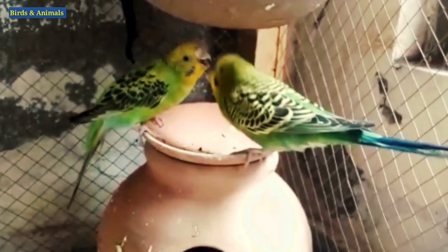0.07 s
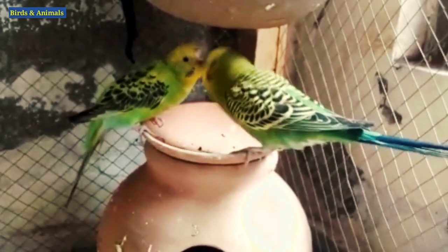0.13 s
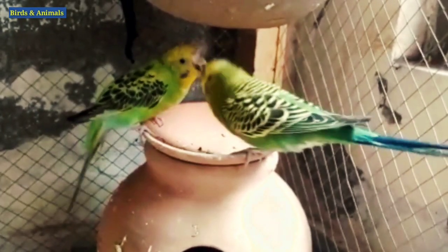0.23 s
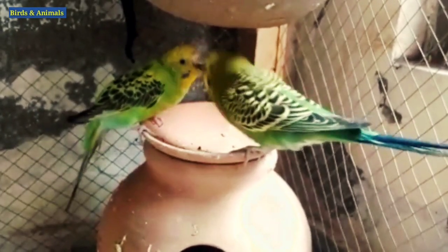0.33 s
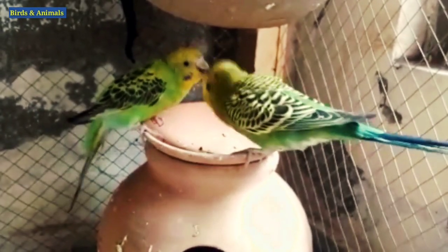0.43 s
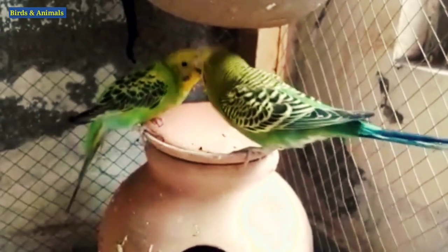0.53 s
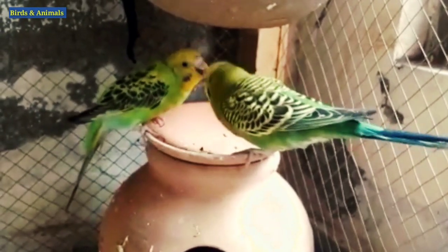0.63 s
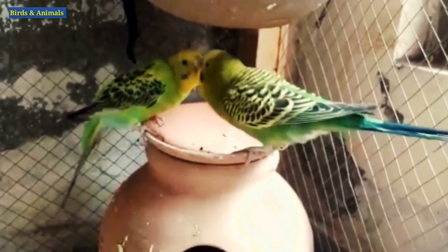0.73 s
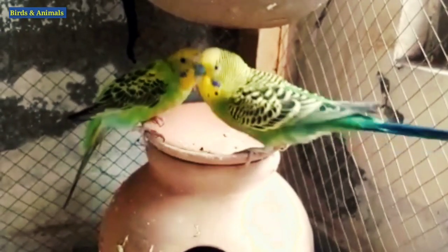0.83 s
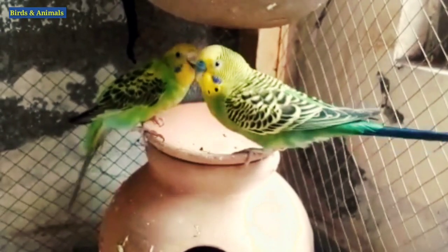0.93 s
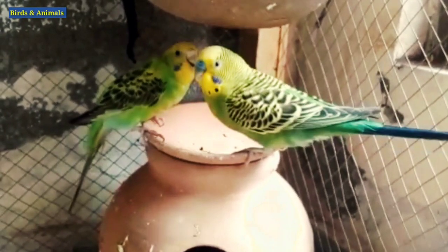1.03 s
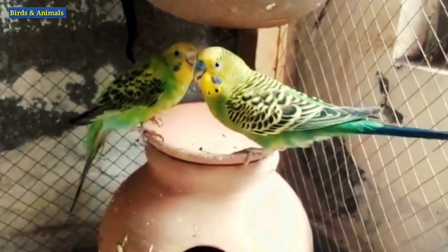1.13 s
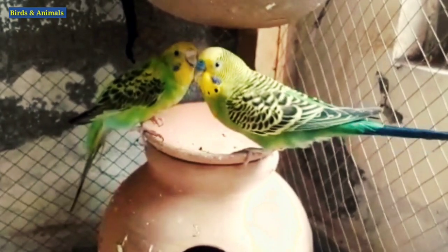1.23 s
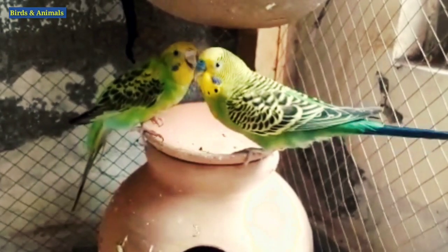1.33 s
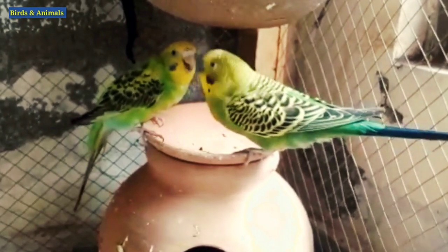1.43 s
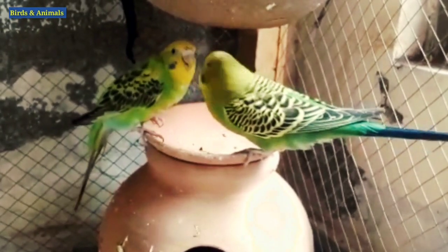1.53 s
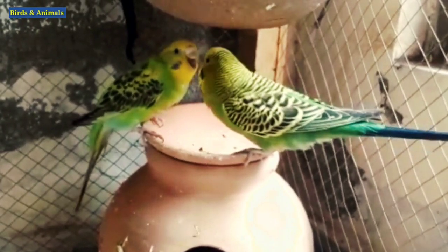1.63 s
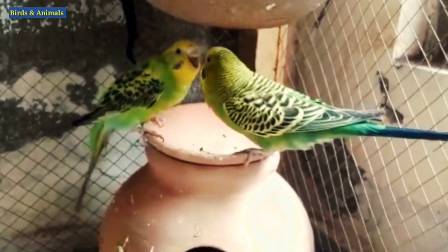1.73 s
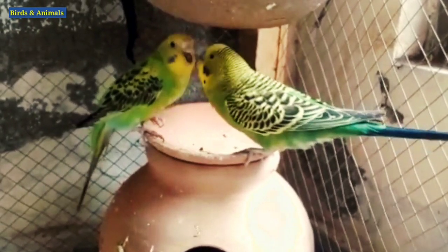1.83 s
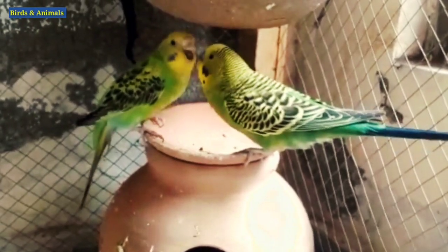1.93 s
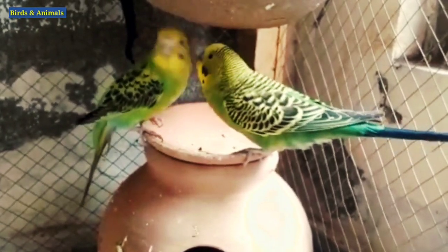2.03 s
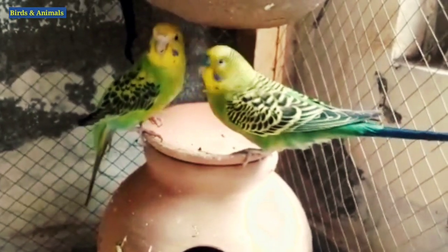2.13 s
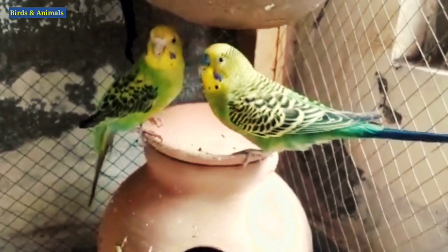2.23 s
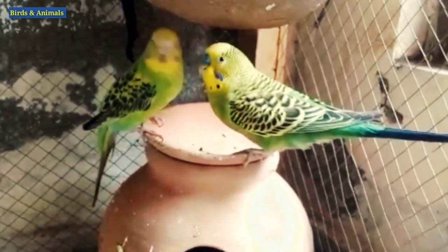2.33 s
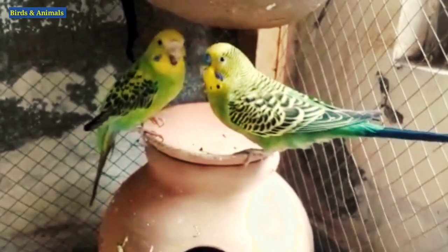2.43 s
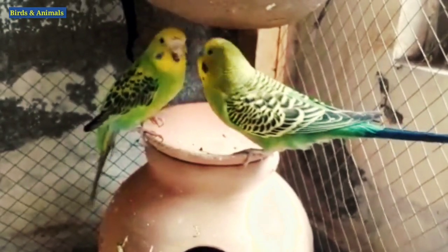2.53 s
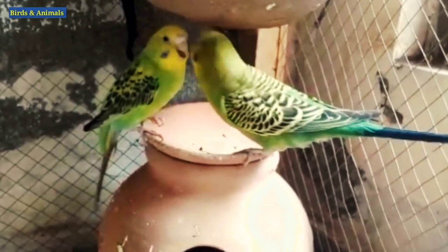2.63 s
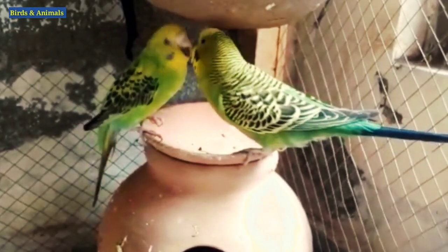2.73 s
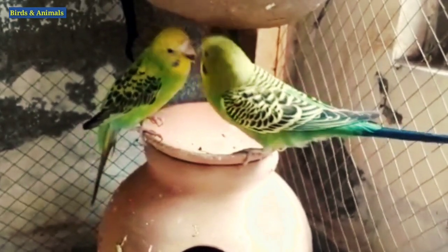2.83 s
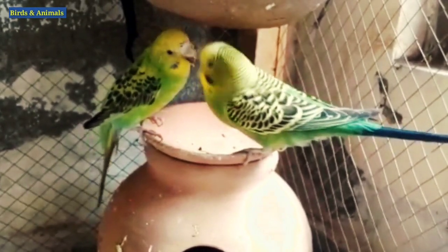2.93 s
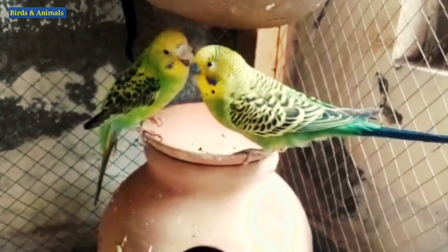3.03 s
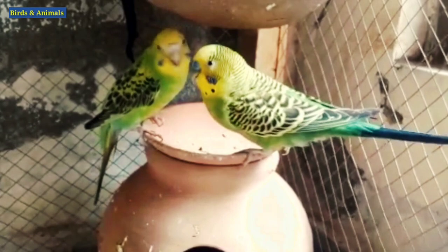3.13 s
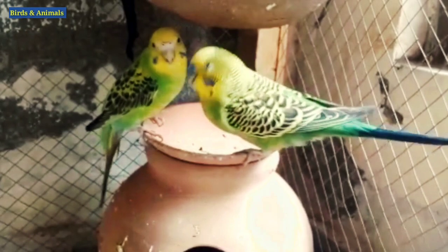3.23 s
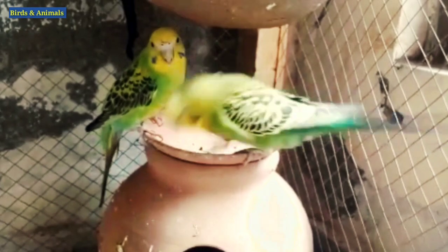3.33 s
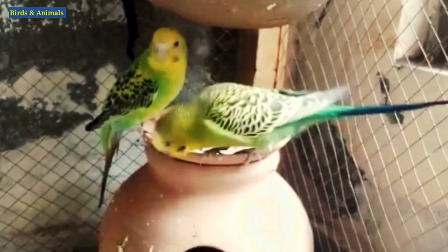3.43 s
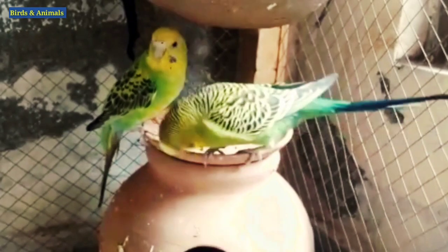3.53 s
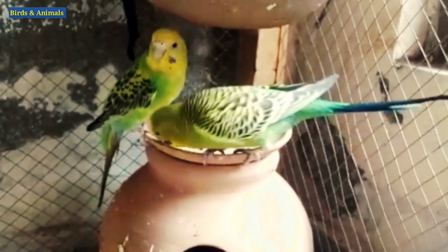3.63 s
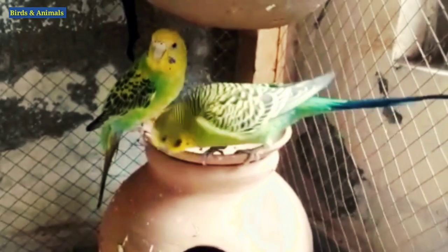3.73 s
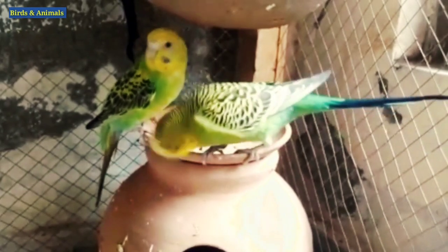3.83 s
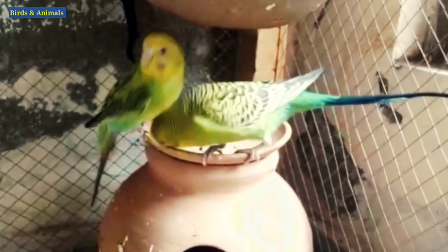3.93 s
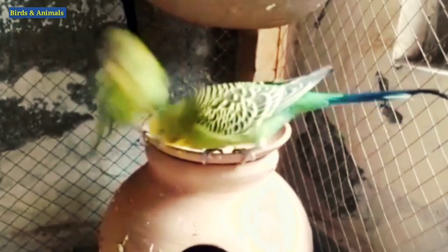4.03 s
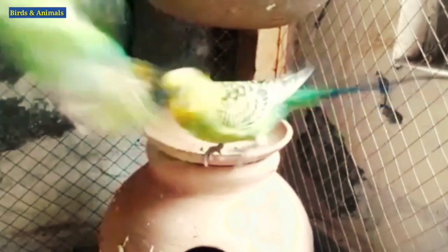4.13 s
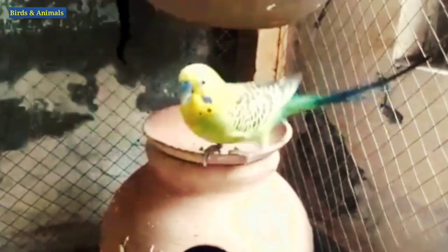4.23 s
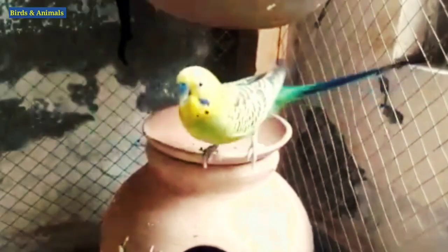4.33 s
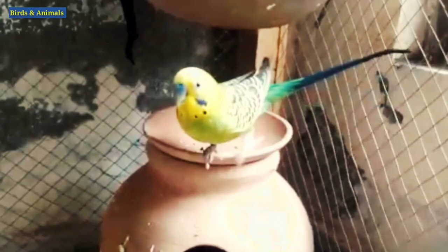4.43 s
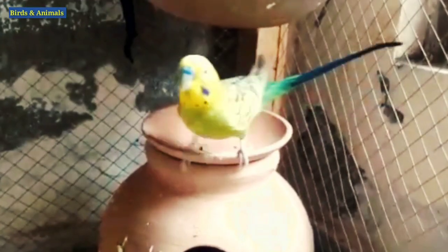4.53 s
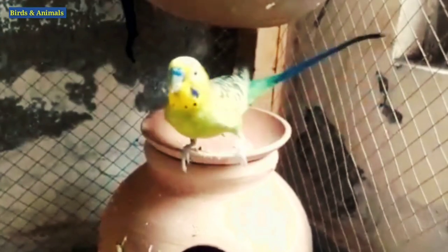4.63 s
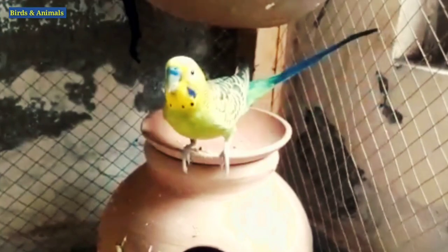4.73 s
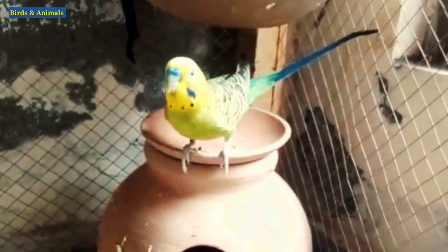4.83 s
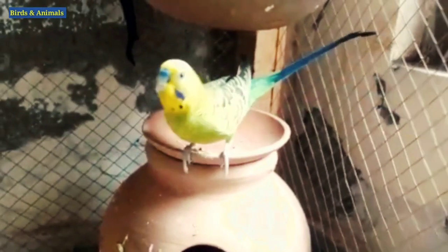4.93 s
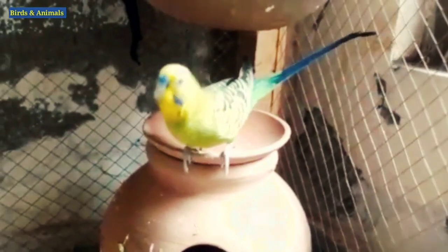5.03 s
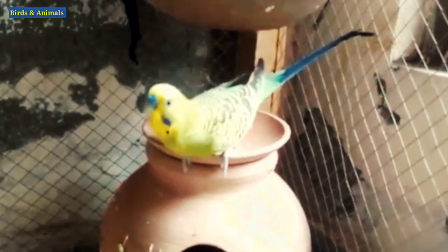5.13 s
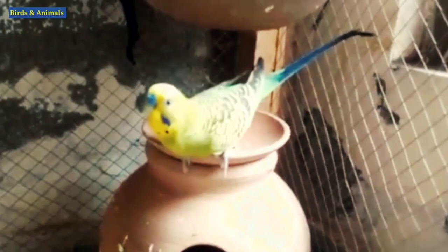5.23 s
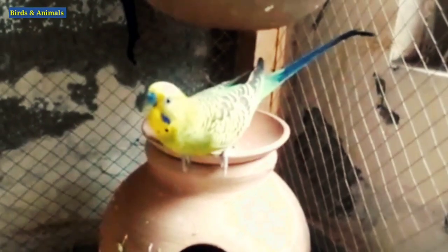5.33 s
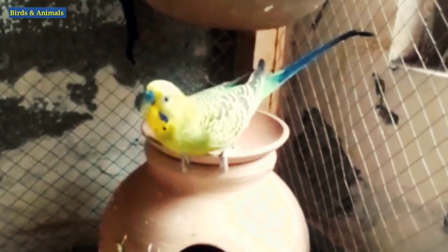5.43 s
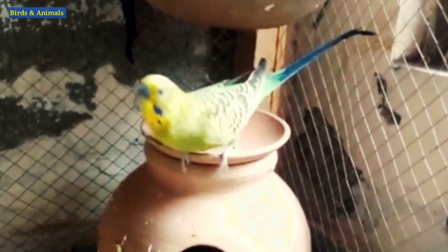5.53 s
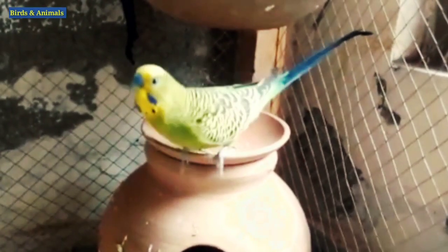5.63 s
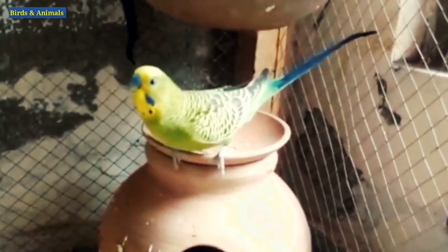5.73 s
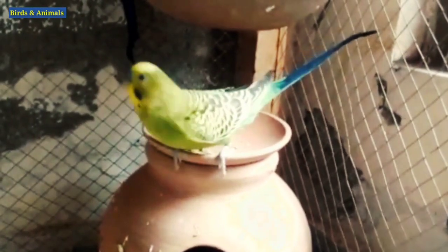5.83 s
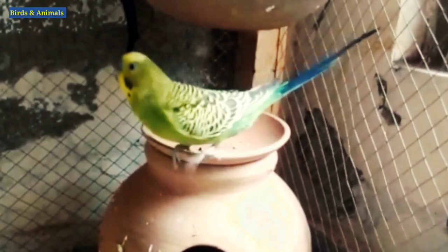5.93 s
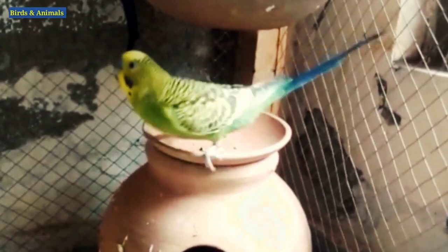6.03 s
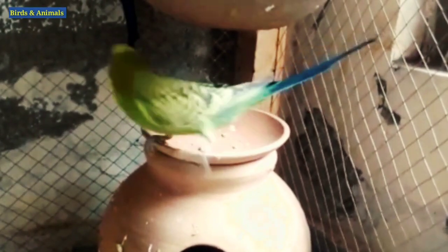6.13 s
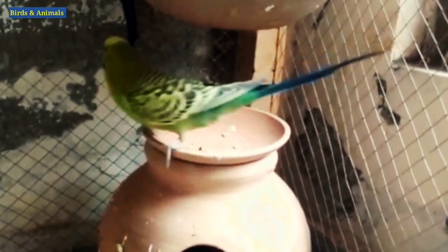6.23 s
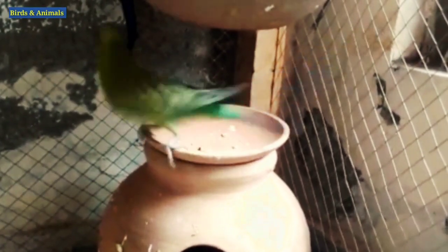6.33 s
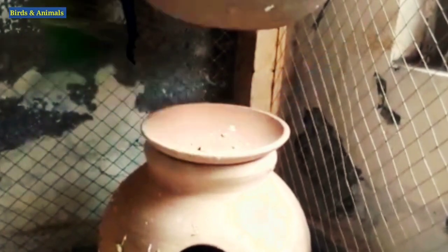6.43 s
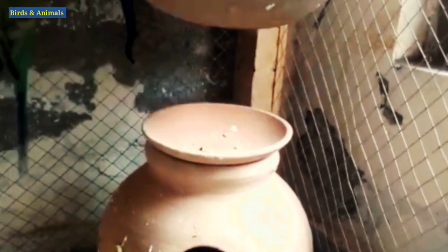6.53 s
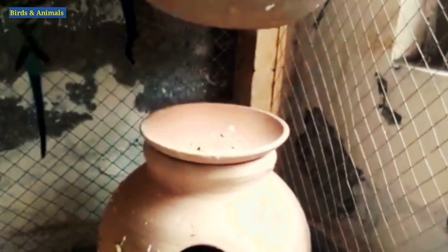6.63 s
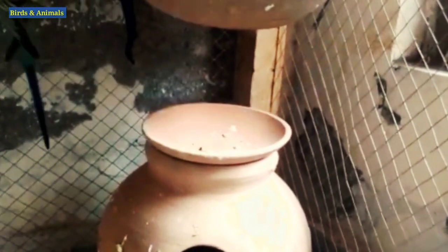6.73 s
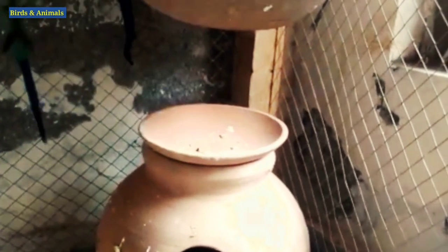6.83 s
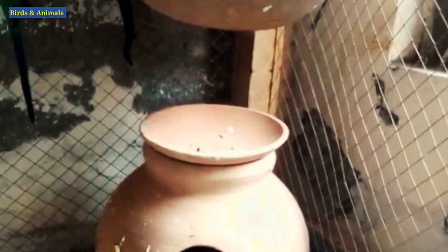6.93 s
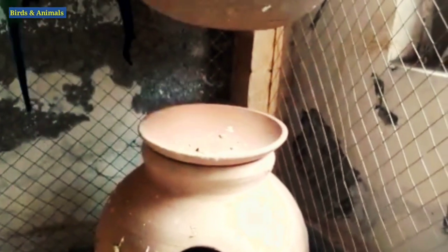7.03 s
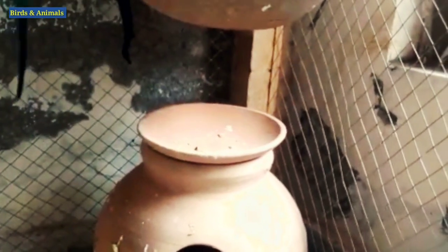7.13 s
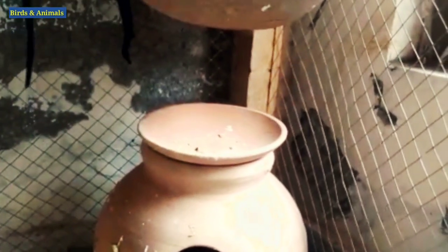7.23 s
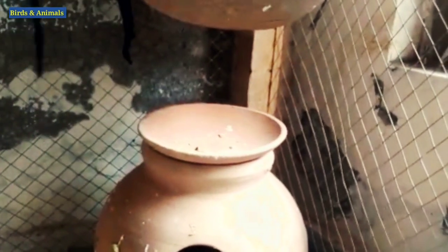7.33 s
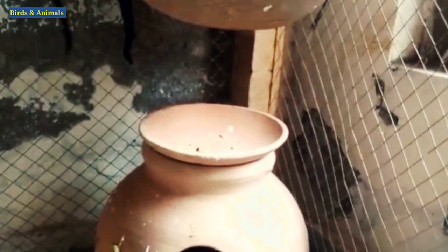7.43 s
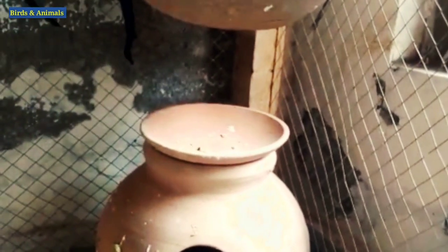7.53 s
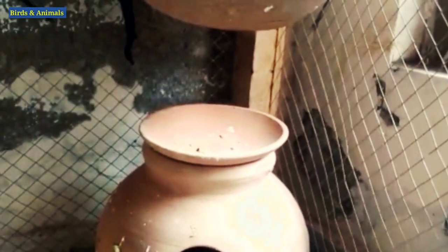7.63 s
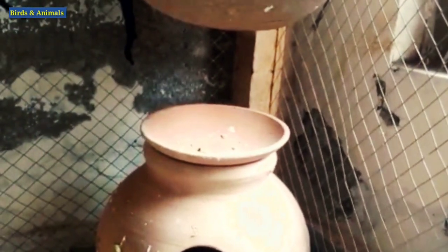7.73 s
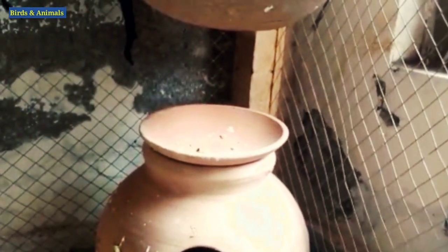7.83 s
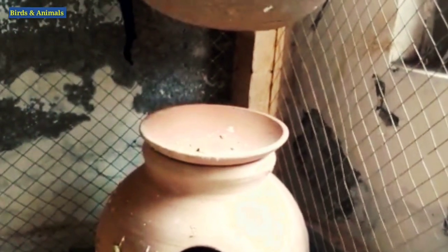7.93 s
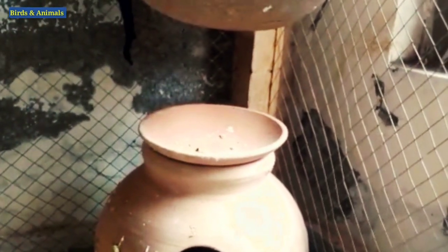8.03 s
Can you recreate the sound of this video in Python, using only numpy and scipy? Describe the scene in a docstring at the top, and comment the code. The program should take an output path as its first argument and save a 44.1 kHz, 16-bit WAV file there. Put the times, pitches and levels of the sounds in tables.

```python
"""Two budgerigars warble and squawk close to the microphone, on a clay dish in a wire cage with hard
walls near by. Each voice is a gliding syrinx tone that throbs and leaks air with effort. One bird flies
off: its feathers swish and its wingbeats buffet the microphone. Claws tick and scrape on the clay, and
feet rock the hollow pot. Far off, a motor drones under rumble and room hiss."""
import sys
import numpy as np
from scipy import signal
from scipy.fft import rfft, irfft, next_fast_len
from scipy.io import wavfile
from scipy.ndimage import uniform_filter1d, map_coordinates

SR = 44100
rng = np.random.default_rng(int(sys.argv[2]) if len(sys.argv) > 2 else 0)


def unload_audio(sound):
    """Save the sound as a 16-bit wav file, at the path given as the first command line argument."""
    columns = np.transpose(np.atleast_2d(sound))
    # keep every value between -1 and 1, then stretch to whole-number steps
    steps = np.round(np.clip(columns, -1, 1) * 32767)
    wavfile.write(sys.argv[1], SR, steps.astype(np.int16))


N = 356047
DOWNSTROKES_S = 4.171 + 0.043 * np.arange(5)  # the five wingbeats of the take-off


def amp(db):
    return 10 ** (np.asarray(db) / 20)


def unit(x):
    """Scale to an rms of 1."""
    return x / np.sqrt(np.mean(x ** 2) + 1e-20)


def along(points, hz):
    """Interpolate (f/Hz, value) points on a log frequency axis."""
    f, values = np.transpose(points)
    return np.interp(np.log(hz + 1), np.log(f + 1), values)


def wobble(rate, size):
    """A smooth random curve, rate knots a second."""
    knots = rng.standard_normal(int(size * rate / SR) + 4)
    return map_coordinates(knots, [np.arange(size) * rate / SR])


def filtered(x, response):
    """Filter x by a gain given as a function of f/Hz."""
    size = next_fast_len(len(x) + 8192)
    return irfft(rfft(x, size) * response(np.fft.rfftfreq(size, 1 / SR)), size)[:len(x)]


def noise(spectrum, patchy_db):
    """Coloured noise of rms 1 with patches of random gain in time and frequency."""
    bins = signal.stft(rng.standard_normal(N), nperseg=512)[2]
    patches = uniform_filter1d(rng.standard_normal(bins.shape), size=6, axis=0)
    patches = uniform_filter1d(patches, size=10, axis=1)
    white = signal.istft(bins * amp(patchy_db * unit(patches)), nperseg=512)[1][:N]
    return unit(filtered(white, lambda hz: amp(along(spectrum, hz))))


def ringing(modes, spread_db, rise_s):
    """One blow on an object: each mode decays from a random strength and phase."""
    t = np.arange(SR // 4) / SR
    ring = sum(amp(db + spread_db * rng.normal() - 60 * t / t60)
               * np.sin(2 * np.pi * (hz * t + rng.random())) for hz, db, t60 in modes)
    return ring * (1 - np.exp(-t / rise_s))


def add(out, s, sound):
    """Mix a sound in at time s."""
    part = out[round(s * SR):][:len(sound)]
    part += sound[:len(part)]


def motor_and_room():
    """Far from the microphone: rumble, the wavering drone of a motor, and room hiss."""
    # course of the background: t/s, rumble level/dB, hiss level/dB
    levels = [(0.0, -48, -59), (3.3, -49.5, -70.5), (4.0, -49.5, -65), (4.32, -39, -62), (4.74, -47, -68),
              (6.2, -49.5, -73), (6.4, -49.5, -59.5), (6.7, -55.5, -66.5), (7.6, -60, -75.5),
              (8.07, -64.5, -88)]
    # orders of the motor: f/Hz, level/dB relative to the rumble
    motor_orders = [(60, -12), (90, -10.5), (121, -3.5), (151, -7)]
    # spectrum of the distant rumble: f/Hz, level/dB
    rumble_spectrum = [(15, -37.5), (25, -24), (43, -1.5), (125, 0.5), (161, -6.5), (182, -15.5),
                       (240, -13.5), (298, -12), (353, -16.5), (389, -31.5), (450, -29.5), (580, -55),
                       (990, -120)]
    # spectrum of the room hiss: f/Hz, level/dB
    hiss_spectrum = [(210, -18), (350, -5.5), (591, -6.5), (1770, -6), (4040, -20), (5630, -16),
                     (7030, -19), (8250, -41), (12700, -29), (15600, -48.5)]
    t = np.arange(N) / SR
    times, *columns = np.transpose(levels)
    rumble_db, hiss_db = (np.interp(t, times, column) for column in columns)
    drone = sum(amp(db + 1.3 * wobble(3.6, N)) * np.sin(2 * np.pi * hz * t + 0.4 * wobble(2.6, N))
                for hz, db in motor_orders)
    low = amp(rumble_db) * (noise(rumble_spectrum, patchy_db=1) + drone)
    return low + amp(hiss_db + 3.5) * noise(hiss_spectrum, patchy_db=2.5)


def walls(direct):
    """Hard walls near the cage add a short, diffuse echo, drawn afresh every quarter second."""
    # decay of the reflections: f/Hz, t60/s
    decay = [(300, 0.55), (2000, 0.35), (6000, 0.21), (12000, 0.24)]
    out, block, delay_s = np.zeros(N), SR // 4, .0045
    for start in range(0, N, block):
        hz, t, bins = signal.stft(rng.standard_normal(SR // 3), SR, nperseg=256)
        tail = signal.istft(bins * amp(-60 * t / along(decay, hz)[:, None]), SR, nperseg=256)[1]
        echo = signal.fftconvolve(direct[start:start + block], tail / np.linalg.norm(tail))
        add(out, start / SR + delay_s, echo)
    return out


def gusts():
    """Each downstroke pushes the microphone's membrane in and lets it swing back, with turbulence."""
    out, t = np.zeros(N), np.arange(SR // 16) / SR
    swell = (t / 0.017) * np.exp(1 - t / 0.013)
    swing = np.sin(2 * np.pi * 58 * t)
    for s in DOWNSTROKES_S:
        add(out, s, amp(-24.5) * swell * (swing + 0.61 * wobble(413, len(t))))
    return out


def wings():
    """Each stroke is a puff of feather noise; the wingbeats fade as the bird leaves the microphone."""
    # spectrum of feather noise: f/Hz, level/dB
    feather_spectrum = [(290, -0.5), (500, -1.5), (666, -3), (1410, -2.5), (2540, -14.5), (4070, -15),
                        (7670, -29), (15500, -39)]
    # rustles of wings and feathers: t/s, t60/s, level/dB, tilt/(dB per octave)
    rustles = [(4.026, 0.37, -46, -2), (4.2, 0.74, -53.5, 0.5), (4.875, 0.25, -55, 4),
               (4.93, 0.48, -54.5, 3), (5.172, .26, -60, 7), (6.527, 0.27, -40.5, 0.5),
               (6.721, 0.15, -63.5, 8.5), (6.8, 0.14, -62.5, 5), (6.839, 0.076, -56, 4.5),
               (7.054, 0.2, -58, 4.5), (7.164, 0.084, -55, 5.5), (7.43, 0.26, -58.5, 1),
               (7.61, 0.11, -65, 7.5), (7.715, 0.5, -53, -0.5)]
    out, t = np.zeros(N), np.arange(SR // 2) / SR
    swish = noise(feather_spectrum, patchy_db=3)
    wingbeats = [(s, 0.17, -37 - 0.7 * k, 2) for k, s in enumerate(DOWNSTROKES_S)]  # same columns
    for strokes, rise_s in (rustles, 0.023), (wingbeats, .004):
        for s, t60, db, tilt in strokes:
            envelope = np.minimum(np.sqrt(t / rise_s), amp(-60 * (t - rise_s) / t60))
            puff = np.resize(swish[round(s * SR):], len(t)) * envelope
            add(out, s, amp(db) * filtered(puff, lambda hz: amp(tilt * np.log2(hz / 2000 + 0.081))))
    return out


def pot():
    """Soft feet rock the hollow clay; left alone, it rocks to rest at uneven gaps."""
    # knocks of the rocking pot: t/s, level/dB
    knocks = [(0.049, -35.5), (0.281, -33), (0.395, -32), (0.709, -38), (1.847, -37), (2.154, -36),
              (2.814, -39), (2.9, -31), (4.039, -34.5), (4.103, -26.5), (4.13, -18.5), (4.15, -18.5),
              (6.218, -30.5), (6.25, -30.5), (6.327, -27), (6.36, -29), (6.418, -33), (6.458, -23.5),
              (6.476, -25), (6.514, -31), (7.728, -43.5), (7.79, -46.5)]
    # modes of the pot: f/Hz, level/dB, t60/s
    pot_modes = [(274, -6.5, .08), (319, 0, 0.13), (349.3, -3.5, 0.12), (411, -4, .06), (504, -5, 0.044),
                 (571.6, -15, 0.13), (1754, -13.5, 0.083), (3290, -29.5, .1)]
    out = np.zeros(N)
    settle_s, gap_s, loss_db = 6.569, 0.057, 1
    settling = [(settle_s + gap_s * (k + 0.22 * rng.normal() * (k > 0)), -39 - loss_db * k)
                for k in range(7)]
    for s, db in knocks + settling:
        add(out, s - .003, amp(db - 2.5) * ringing(pot_modes, spread_db=1.5, rise_s=.008))
    return out


def claw_ticks():
    """Each tick is a dry scratch on the clay; a bird standing on the dish adds faint ones at random."""
    # claw ticks: t/s, level/dB
    ticks = [(3.541, -51), (4.102, -31), (4.174, -32), (4.209, -27.5), (4.438, -37.5), (4.464, -38),
             (4.487, -40.5), (4.537, -43), (4.616, -47.5), (4.73, -45.5), (4.824, -53.5), (4.955, -44),
             (5.044, -48.5), (5.172, -42.5), (5.215, -50.5), (5.512, -51), (5.705, -49.5), (6.275, -54),
             (6.306, -54), (6.559, -36), (6.805, -47), (7.025, -51), (7.06, -48), (7.712, -46.5)]
    # a claw hits the rim flat: t/s, level/dB
    rim_taps = [(6.421, -33.5), (6.473, -38.5)]
    out, t = np.zeros(N), np.arange(SR // 16) / SR
    fidgets = [(rng.uniform(3.4, 6.4), rng.normal(-66, 3)) for _ in range(30)]
    envelope = amp(-60 * t / .035) * (1 - np.exp(-t / .003))
    for s, db in ticks + fidgets:
        sharp, dull = rng.standard_normal((2, len(t))) * envelope
        add(out, s, amp(db - 1) * filtered(sharp, lambda hz: np.clip(hz / 9000, 0, 1) ** 2))
        add(out, s, amp(db + 4) * filtered(dull, lambda hz: hz < 7400))
    for s, db in rim_taps:
        tap = rng.standard_normal(len(t)) * amp(db - 60 * t / .014)
        add(out, s, filtered(tap, lambda hz: (hz > 900) & (hz < 6000)))
    return out


def claw_scrapes():
    """While claws slide, tiny slips rasp and keep the dish ringing, now one mode, now another."""
    # slides on the dish: t/s, hold/s, level/dB
    slides = [(3.435, .01, -64), (3.537, 0.019, -56), (3.699, 0.36, -65), (4.098, 0.045, -53),
              (4.27, 0.13, -56.5), (4.633, 0.033, -56.5), (5.192, 0.0096, -62), (5.39, 0.022, -64),
              (5.695, 0.05, -58), (6.085, 0.017, -60), (6.126, 0.035, -60), (6.282, 0.041, -57.5),
              (6.418, 0.033, -50.5)]
    # modes of the dish: f/Hz, level/dB
    dish_modes = [(1770, -8), (2050, -9), (3130, -5), (5150, 1), (6050, 3.5), (6480, -6), (7310, 1.5),
                  (9400, -3.5), (9950, 0.5), (10250, -1), (12360, 2.5), (12900, 4), (13250, 1)]
    rasp_spectrum = [(1500, -10), (6500, 6), (8300, -16), (13000, 2)]  # f/Hz, level/dB
    grip_db_per_s, release_db_per_s = 450, 300
    t = np.arange(N) / SR
    pressure = sum(amp(db - grip_db_per_s * np.maximum(s - t, 0)
                       - release_db_per_s * np.maximum(t - s - hold, 0)) for s, hold, db in slides)
    jerks = rng.random(N) < 400 / SR
    slips = (jerks + 0.043) * rng.standard_normal(N) * pressure
    slips *= unit(amp(3 * wobble(30, N)))  # the claw grips and lets go
    out = amp(11) * filtered(slips, lambda hz: amp(along(rasp_spectrum, hz)))
    for hz, db in dish_modes:
        drive = slips * unit(amp(3.5 * wobble(26, N)))
        t60 = .028 * np.sqrt(14000 / hz)
        ring = ringing([(hz, db, t60)], spread_db=-1, rise_s=0.00039)
        out += amp(-10.5) * signal.oaconvolve(drive, ring)[:N]
    return out


def tongue_clicks(breath):
    """The tongue clicks, singly or in quick runs: each click is a short burst of breath noise."""
    # single clicks: t/s, level/dB
    clicks = [(0.3416, -17.5), (1.5994, -38), (1.8033, -31.5), (1.8512, -45), (1.9599, -36), (2.4594, -41),
              (2.4694, -36), (2.4823, -30), (2.5247, -19), (3.841, -31)]
    # runs of clicks: start t/s, end t/s, rate/Hz, level/dB
    trills = [(1.648, 1.697, 100, -47), (1.694, 1.714, 162, -37.5)]
    out, t = np.zeros(N), np.arange(600) / SR
    envelope = amp(-60 * t / 0.0101) * (1 - np.exp(-t / 0.0011))
    runs = [(s, db) for start, end, rate, db in trills for s in np.arange(start, end, 1 / rate)]
    for s, db in clicks + runs:
        add(out, s, amp(db) * envelope * breath[round(s * SR):][:len(t)])
    return out


def syrinx(glide_hz, highest_hz, second_db, rough):
    """The membrane sings a gliding tone; effort makes it throb. Returns the tone and the throb gain."""
    # colour of the voice from the 3rd harmonic up, including the microphone's drop above 7.5 kHz:
    # f/Hz, gain/dB
    colour = [(600, 7.5), (4000, -0.5), (6200, -2), (7200, -6.5), (8200, -15.5), (15000, -12)]
    size, throb_hz, squawk_rough = len(glide_hz), 290, .74
    throb_cycles = np.cumsum(throb_hz * (1 + .2 * wobble(150, size))) / SR + rng.random()
    sweep = .055 * min(rough / squawk_rough, 1) ** 3 * np.sin(2 * np.pi * throb_cycles)
    waver = .007 * wobble(35, size) + .006 * wobble(110, size) + 0.015 * rough * wobble(70, size)
    jitter = (0.0024 + 0.056 * rough ** 3) * np.clip(wobble(420, size), -2, 2)
    phase = 2 * np.pi * np.cumsum(glide_hz * (1 + sweep + waver + jitter)) / SR
    shine = unit(amp(3.5 * wobble(30, size)))  # overtones come and go as the beak moves
    fall_db_per_octave = max(19.5 - 1.3 * max(second_db, 0), 3)
    overtones = amp(second_db) * np.sin(2 * phase)
    for k in range(3, int(15000 / highest_hz) + 1):
        source_db = 0.99 * second_db - 6 - fall_db_per_octave * np.log2(k / 3)
        overtones += amp(source_db + along(colour, k * glide_hz)) * np.sin(k * phase)
    tone = np.sin(phase) + (shine if rough < squawk_rough else 1) * overtones
    tone *= unit(amp(2.2 * wobble(70, size)))  # the voice falters
    tone *= unit(1 + 0.42 * rough ** 3 * wobble(2000, size))  # turbulence smears rough notes
    # uneven closures of the membrane chop the sound into bursts
    closures = 7.6 * np.cos(2 * np.pi * throb_cycles) + 1.3 * np.tanh(wobble(260, size))
    return tone, unit(amp(min(0.062 + rough, .8) * closures))


def budgerigars():
    """Close to the microphone, the birds string gliding, breathy syllables and clicks into a warble."""
    # syllables: t/s, length/s, start f/Hz, turn f/Hz, end f/Hz, place of the turn/0-1, level/dB,
    # 2nd harmonic/dB relative to the 1st, roughness/0-1, breath/dB relative to the level
    syllables = [(0.015, 0.022, 3150, 3170, 3100, 0.4, -42, 10.5, 0.6, 8),
                 (0.031, 0.059, 3000, 3300, 3330, 0.56, -33, 14, 0.8, 10),
                 (0.099, 0.014, 6500.0, 4900, 7700, 0.46, -32, -40.5, 0.3, -19.5),
                 (0.15, 0.057, 2800, 3100, 3300, 0.59, -33, 12.5, 0.91, 10.5),
                 (0.192, 0.046, 3227, 3100, 2500, 0.7, -27.5, -3, 0.3, -11.5),
                 (0.238, 0.01, 1865, 2000, 1700, 0.5, -33.5, -7.5, 0.37, 4.5),
                 (0.253, 0.019, 3200, 3330, 3130, 0.38, -23.5, -19, 0.3, -16),
                 (0.27, 0.052, 2637, 2700, 1390, 0.53, -27.5, -17.5, 0.64, -10),
                 (0.333, 0.049, 2850.0, 2630, 2130.0, 0.27, -35.5, -15.5, 0.48, -7),
                 (0.372, 0.02, 5700, 6130, 5500, 0.47, -29, -19, 0.45, -13.5),
                 (0.375, 0.045, 1713, 1670, 1970, 0.5, -37, -17, 0.24, -4),
                 (0.397, 0.032, 4900, 3200, 2750, 0.43, -35.5, -18.5, 0.3, -8),
                 (0.427, 0.031, 1873, 1800.0, 2160.0, 0.46, -35, -6, 0.48, -6.5),
                 (0.449, 0.016, 2820, 3200.0, 2950.0, 0.5, -32, -22, 0.38, -10),
                 (0.47, 0.041, 2585, 2800, 2500, 0.55, -39, -26, 0.4, -14.5),
                 (0.522, 0.02, 2320, 2050, 1850, 0.42, -40.5, -20.5, 0.14, -17),
                 (0.583, 0.017, 990, 1010, 950, 0.69, -39.5, 9, 0, 13),
                 (0.609, 0.071, 4220, 4910, 4730, 0.35, -17.5, -30, 0.8, -33),
                 (0.737, 0.032, 1504, 1650, 1300, 0.45, -34.5, -6.5, 0.88, -10.5),
                 (0.756, 0.022, 2780, 2450, 3200, 0.52, -37, -26, 0.27, -10),
                 (0.783, 0.048, 1950, 2920, 1900, 0.6, -34, -26, 0.35, -14),
                 (0.823, 0.026, 1450, 1720, 1700, 0.54, -30, -18, 0.45, -22),
                 (0.837, 0.054, 3450, 3040, 2400, 0.54, -37, -23, 0.35, -11),
                 (0.862, 0.061, 774, 1140, 1260, 0.62, -51, -1, 0.3, -14),
                 (0.898, 0.043, 2076, 1600, 1590, 0.58, -35.5, -27.0, 0.23, -19),
                 (0.946, 0.028, 2000.0, 2160, 1800, 0.5, -45.5, -1, 0.85, -16),
                 (0.975, 0.016, 1400.0, 1400, 1460, 0.46, -42.5, -1.5, 0.33, -14),
                 (1.002, 0.012, 1300.0, 1200, 1550, 0.52, -45.5, 0, 0.83, -15.0),
                 (1.023, 0.09, 839, 750, 936.0, 0.4, -57, 7.5, 0.03, -1),
                 (1.107, 0.041, 1260, 1290, 1040, 0.22, -44.5, -2.5, 0.66, -7.5),
                 (1.125, 0.037, 1720, 1680, 1240, 0.62, -42.5, -16, 0.2, -28),
                 (1.164, 0.058, 1450, 1260, 1330, 0.5, -49, -5.5, 0, -31),
                 (1.211, 0.032, 880, 860, 1587.0, 0.25, -41.5, -0.5, 0.5, -8),
                 (1.325, 0.057, 1102, 1000, 1050, 0.7, -53.5, -5, 0.55, -8.5),
                 (1.348, 0.0065, 4150, 4500, 3100, 0.75, -36, -39, 0.4, -11),
                 (1.353, 0.046, 3144, 3250, 1580, 0.41, -36.5, -8.5, 0.48, -4.5),
                 (1.396, 0.03, 2390, 3300, 2300, 0.55, -32.5, -25, 0.72, -11),
                 (1.423, 0.02, 4140, 3500, 4700, 0.6, -28.5, -19, 0.4, -8),
                 (1.443, 0.022, 2430.0, 2500, 2100, 0.2, -33, -21, 0.08, -13),
                 (1.447, 0.025, 2950, 2880, 2830, 0.54, -23.5, -3.5, 0.04, -28),
                 (1.473, 0.014, 1440, 1750, 1480, 0.42, -36.5, -18.5, 0.38, 8.5),
                 (1.725, 0.039, 1393, 1640, 1487.0, 0.58, -47.5, -2.5, 0.4, -24),
                 (1.87, 0.061, 1347, 1267.0, 1150, 0.55, -49.5, -3.5, 0.38, -28),
                 (1.995, 0.032, 1096, 1180, 1670, 0.61, -47, -1.5, 0.93, -11.5),
                 (2.027, 0.035, 1300, 1370, 1200, 0.53, -51, -7.5, 0.3, -25.5),
                 (2.107, 0.025, 1434, 1500, 1130, 0.38, -43, -5.5, 0.42, -2),
                 (2.171, 0.044, 1822, 1632.0, 1280, 0.43, -46, -3, 0.45, -9.5),
                 (2.228, 0.0091, 4100.0, 4500, 4090, 0.4, -46.0, -20.0, 0.7, -1.5),
                 (2.24, 0.015, 4320, 4500, 2900, 0.36, -37.5, -16.5, 0.7, 0.5),
                 (2.257, 0.016, 3190, 2800, 1800, 0.65, -30.5, 6.5, 0.3, -7.0),
                 (2.274, 0.018, 2290, 2170, 1960, 0.48, -36.5, 11, 0.35, 5),
                 (2.297, 0.011, 1830, 1790, 1620, 0.48, -29.5, -0.5, 0, 8.5),
                 (2.311, 0.038, 2750, 2770, 2150, 0.71, -24, -41, 0.2, -7.5),
                 (2.535, 0.022, 1500, 1430, 1510, 0.5, -36.5, 4, 0.4, 6.5),
                 (2.611, 0.024, 3900, 2750, 3200, 0.55, -32.5, -30, 0.45, -6),
                 (2.616, 0.024, 950, 1105, 930, 0.37, -37, -0.5, 0.17, -10.5),
                 (2.73, 0.0093, 3300, 2900, 2900, 0.65, -42, -10.5, 0.3, -12),
                 (2.739, 0.013, 2900, 2280, 2900, 0.65, -29.5, -23.5, 0.55, -18),
                 (2.756, 0.025, 3300, 4000, 2700, 0.45, -30, -22.5, 0.35, -17),
                 (2.797, 0.011, 1530, 1650, 2300, 0.56, -39.5, -2, 0.7, -7.5),
                 (2.811, 0.039, 2930, 2750, 2600, 0.32, -32.5, -23.5, 0.43, -14),
                 (2.883, 0.044, 3150, 3190, 2900, 0.42, -28, 13.5, 0.86, 7),
                 (3.004, 0.031, 3638, 1680, 1470, 0.58, -36, -12.5, 0.53, -4.5),
                 (3.018, 0.032, 3710, 3800, 3920.0, 0.5, -39, -27, 0.5, -3),
                 (3.048, 0.027, 3580, 3600, 2700.0, 0.2, -29.5, -13, 0.65, -11.5),
                 (3.078, 0.0029, 1590, 1630, 1700, 0.54, -27.5, -3, 0.27, 1),
                 (3.081, 0.021, 2234, 2200, 2150, 0.87, -35.5, 5, 0.5, -2.5),
                 (3.103, 0.03, 3560, 3400, 3700, 0.4, -25.5, -22, 0.53, -25.5),
                 (3.125, 0.045, 3160, 2450, 2450, 0.63, -34, -41.5, 0.35, -12.5),
                 (3.147, 0.036, 1544, 1840, 1320, 0.69, -37.5, -11.5, 0.39, -13.5),
                 (3.369, 0.037, 1169, 1210, 1050, 0.5, -45.5, -3, 0.65, -3),
                 (3.448, 0.04, 1304, 833.0, 1134.0, 0.54, -49.5, -2, 0.5, -12),
                 (3.487, 0.053, 862, 810, 760, 0.5, -53.5, -0.5, 0, -31),
                 (3.596, 0.027, 2050.0, 1770, 2200, 0.5, -55.5, -10, 0.5, -14),
                 (3.629, 0.05, 1472, 1330, 1070, 0.4, -58, -7, 0.42, -7),
                 (3.723, 0.045, 1975, 2440, 2250, 0.58, -40.5, -6, 0.15, -17),
                 (3.752, 0.11, 2390, 2200, 2260, 0.69, -36, -12, 0.15, -19.5),
                 (3.865, 0.029, 2200, 1840, 1200, 0.62, -41, -8.5, 0.35, -8.5),
                 (3.966, 0.0096, 2290, 2300, 3000, 0.57, -48, -19.0, 0.94, -2),
                 (3.978, 0.045, 3150, 2980, 2950, 0.4, -50, -9, 0.3, -11),
                 (4.009, 0.036, 2400, 1880, 1950, 0.66, -38.5, -18, 0.55, -8),
                 (4.044, 0.09, 2168, 2115, 2150, 0.54, -39, -7, 0.2, -15.5),
                 (4.148, 0.062, 2020, 1830, 1880, 0.7, -41, -12, 0.25, -18),
                 (4.212, 0.077, 2030, 2000, 2010, 0.52, -36, -15.5, 0.3, -17),
                 (4.216, 0.0081, 925, 820, 1200, 0.37, -38, -17, 0.3, -17),
                 (4.292, 0.024, 1900, 1280, 1220, 0.39, -39.5, -8, 0.45, -5),
                 (6.897, 0.018, 2230, 2140.0, 2340.0, 0.3, -52.5, -2.5, 0.2, -18),
                 (6.957, 0.017, 2210, 2100, 2320, 0.3, -50, 2.5, 0.42, -3)]
    # spectrum of turbulent breath: f/Hz, level/dB
    breath_spectrum = [(500, -36.5), (1200, -12), (3000, 3.5), (6200, 3), (7600, -19.5), (9000, -20),
                       (15000, -26.5)]
    out, breath = np.zeros(N), noise(breath_spectrum, patchy_db=5.5)
    linger, swell_db_per_octave, release_s = .6, 5.5, 0.0032
    for s, length, *pitches_hz, turn_at, db, second_db, rough, breath_db in syllables:
        t = np.arange(round((length + .004) * SR)) / SR
        progress = t / t[-1]
        stage = np.interp(progress, [0, turn_at, 1], [0, 1, 2])
        stage -= linger * np.sin(2 * np.pi * stage) / (2 * np.pi)  # dwell on each of the three pitches
        glide_hz = uniform_filter1d(np.interp(stage, [0, 1, 2], pitches_hz), size=80, mode="nearest")
        tone, throb = syrinx(glide_hz, max(pitches_hz), second_db, rough)
        attack_s = .0035 + .2 * length * rough ** 3
        envelope = np.clip(np.minimum(t / attack_s, (t[-1] - t) / release_s), 0, 1) ** 1.1
        swell_db = swell_db_per_octave * np.log2(glide_hz / glide_hz.mean())
        fade_db = 1.5 * rough * (progress - 0.33)
        leak = amp(breath_db) * breath[round(s * SR):][:len(t)]
        add(out, s - .002, amp(db + swell_db - fade_db) * envelope * throb * (np.sqrt(2) * tone + leak))
    return out + tongue_clicks(breath)


def scene():
    """One microphone by the cage: the close sounds, their reflections, the gusts and the background."""
    near = budgerigars() + claw_ticks() + claw_scrapes() + pot() + wings()
    return (near + amp(-8) * walls(near) + gusts() + motor_and_room())[None]


def record(dry):
    """A safety limiter rounds off the loudest peaks; the deepest bass and highest treble are cut."""
    ceiling, low_cut_hz, stop_hz = .85, 36, 15760
    rounded = dry[0] / (1 + np.abs(dry[0] / ceiling) ** 6) ** (1 / 6)

    def passband(hz):
        high_cut = np.sin(np.pi / 2 * np.clip((stop_hz - hz) / 80, 0, 1)) ** 2
        return high_cut / np.sqrt(1 + (low_cut_hz / (hz + 1)) ** 8)

    return filtered(rounded, passband)[None]


dry = scene()
out = record(dry)
unload_audio(out)
```